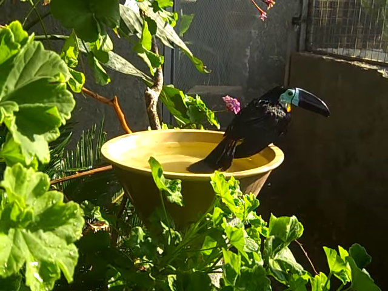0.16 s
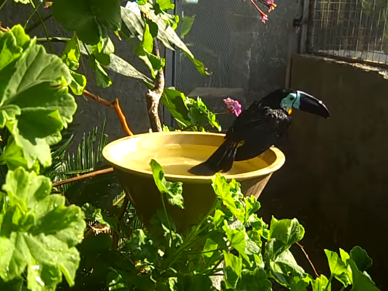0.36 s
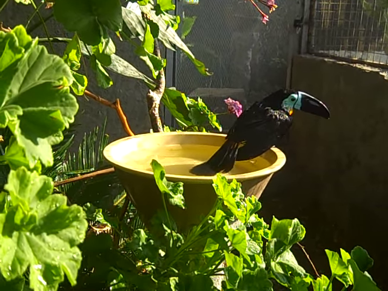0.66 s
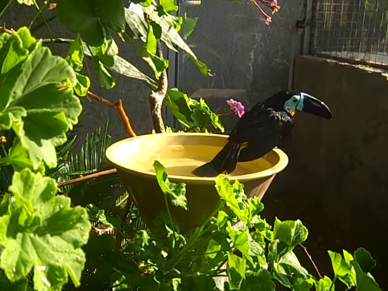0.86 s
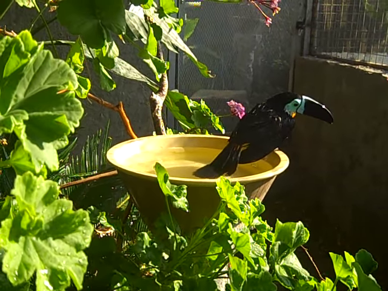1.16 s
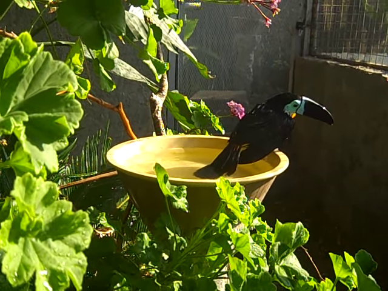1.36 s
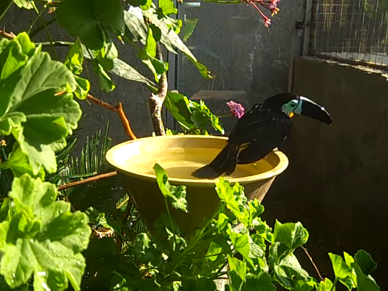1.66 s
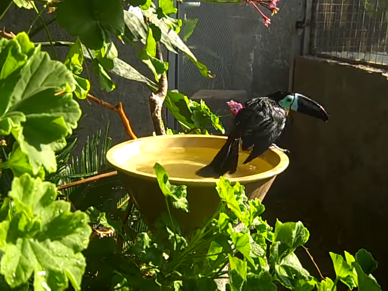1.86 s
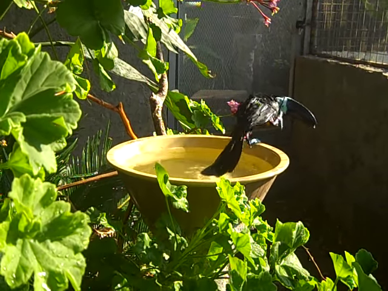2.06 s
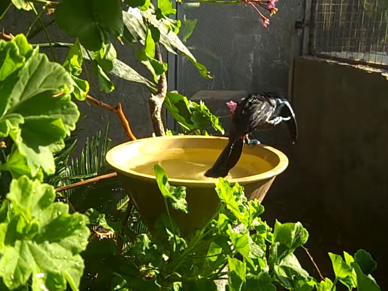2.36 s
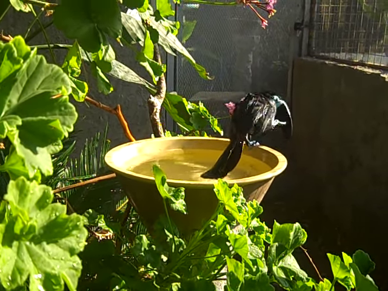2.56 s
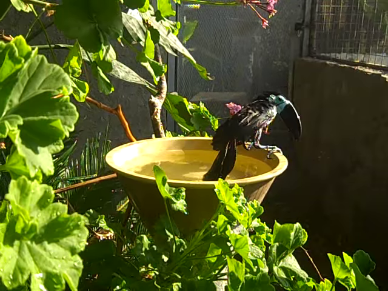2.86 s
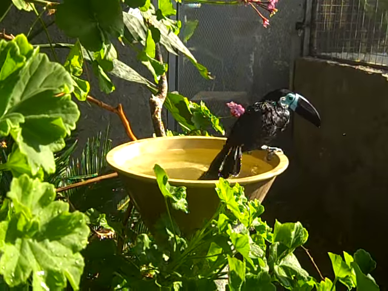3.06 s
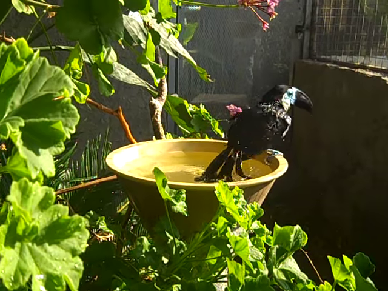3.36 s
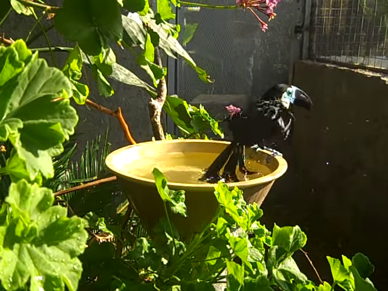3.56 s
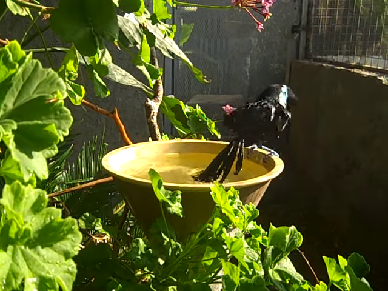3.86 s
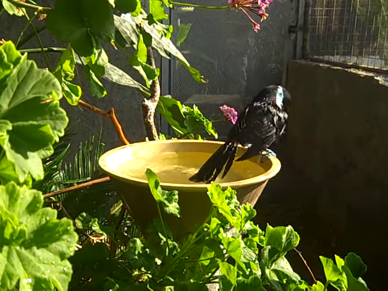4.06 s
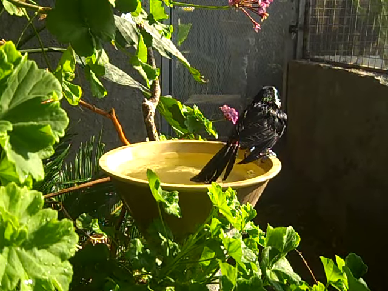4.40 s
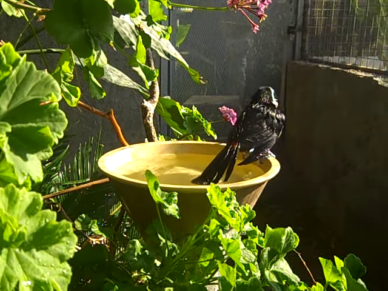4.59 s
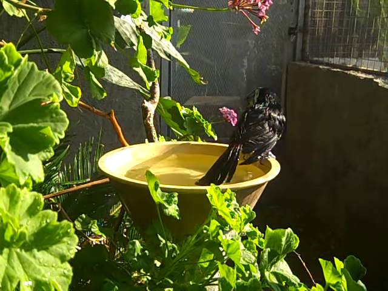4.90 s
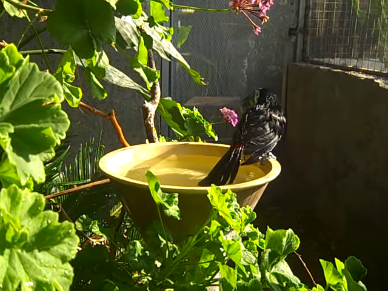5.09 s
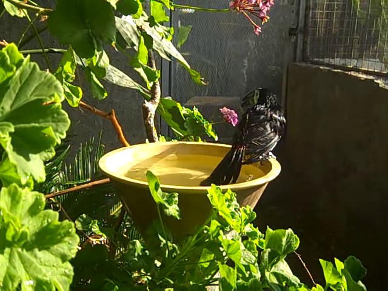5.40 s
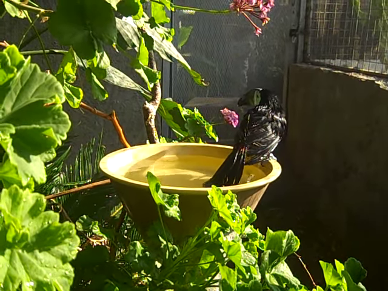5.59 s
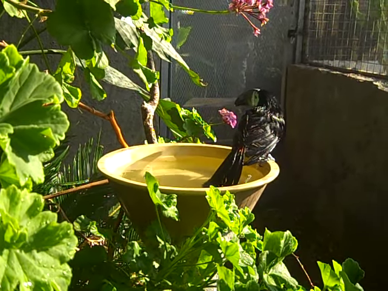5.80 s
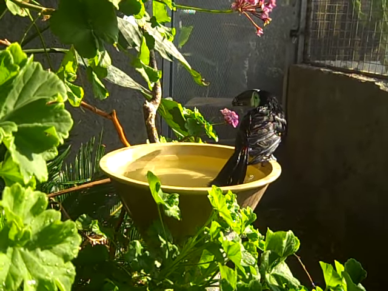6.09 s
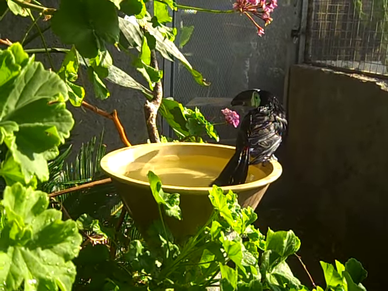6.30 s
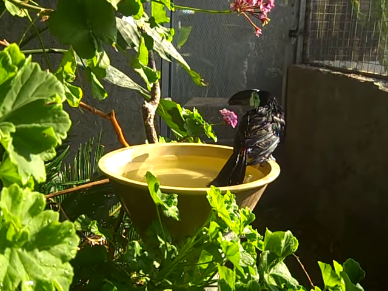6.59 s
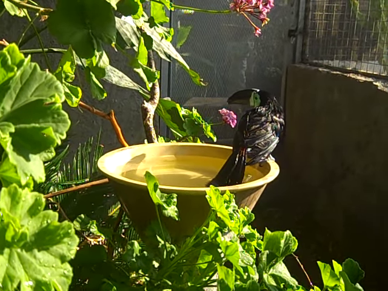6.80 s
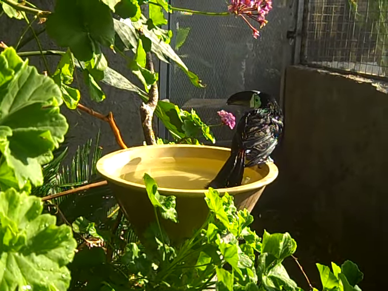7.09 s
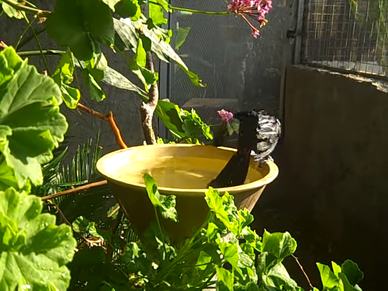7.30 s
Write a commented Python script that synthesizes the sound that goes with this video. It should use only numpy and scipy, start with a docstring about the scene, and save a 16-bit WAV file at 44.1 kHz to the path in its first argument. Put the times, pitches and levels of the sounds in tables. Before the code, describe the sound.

Piercing parrot screeches dominate, each bursting out with torn rasp before locking into a high, sagging whistle. Between the first three and the later ones, bright claw ticks, short wet feather swishes and a soft plumage ruffle come from a toucan on a bowl rim. Hoarse squawks and scratchy chirps sound behind, everything echoing in a small hard enclosure with faint air, loud peaks a little saturated.

```python
"""Hard-walled aviary: a parrot screeches ten times close by, the first already under way at the start.
Screech: two whistling membranes clash into sum and difference tones, with a rasp of torn noise.
A wet toucan on the rim of a water bowl ticks, swishes and rustles: short bursts of coloured noise.
Further off: bigger parrots squawk and call (pulses through throat resonances), small birds chirp
(gliding harmonics with scratch noise). Walls ring behind all the birds; quiet air noise lies beneath."""
import sys
import numpy as np
from scipy import signal
from scipy.fft import rfft, irfft, next_fast_len
from scipy.io import wavfile

SR = 44100
rng = np.random.default_rng(int(sys.argv[2]) if len(sys.argv) > 2 else 0)


def digitize_waveform(pressure):
    """Quantize a signal to 16-bit integers and store it at the path in sys.argv[1].

    Rows of a 2-D input are taken as channels; values are limited to [-1, 1].
    """
    field = np.atleast_2d(pressure).T
    bounded = np.clip(field, -1, 1)
    quanta = np.round(bounded * 32767).astype(np.int16)
    wavfile.write(sys.argv[1], SR, quanta)


N = 328545


def amp(db):
    """Decibels to gain."""
    return 10 ** (np.asarray(db) / 20)


def unit(x):
    """Scale to rms 1."""
    return x / np.sqrt(np.mean(np.abs(x) ** 2))


def colour(x, points):
    """Filter by a (f/Hz, gain/dB) spectrum, interpolated over log frequency."""
    hz, db = np.transpose(points)
    size = next_fast_len(len(x) + 512)
    f = np.maximum(np.fft.rfftfreq(size, 1 / SR), 1)
    gain = amp(np.interp(np.log(f), np.log(hz), db))
    return irfft(rfft(x, size) * gain, size)[:len(x)]


def wander(n, rate_hz):
    """Smooth random signal of rms 1, low-passed at rate_hz."""
    sos = signal.butter(2, min(rate_hz, SR / 3), fs=SR, output="sos")
    lead_in = int(SR / max(rate_hz, 5))
    return unit(signal.sosfilt(sos, rng.standard_normal(n + lead_in))[-n:])


def grains(n, rate_hz, spread_db):
    """Noise in lumps of uneven size, rms 1."""
    return unit(rng.standard_normal(n) * amp(spread_db * wander(n, rate_hz)))


def turns(hz):
    """Phase in radians of a moving frequency."""
    return 2 * np.pi * np.cumsum(hz) / SR


def arch(length_s):
    """Rounded rise and fall."""
    return np.sqrt(np.hanning(int(max(length_s, .005) * SR)))


def soft_edges(t, edge_s):
    """Gate that opens and closes in edge_s."""
    return np.clip(np.minimum(t, t[-1] - t) / edge_s, 0, 1)


def swell(rise_s, fall_s, depth_db, edge_s):
    """Gain that climbs depth_db to a rounded top and sinks again."""
    t = np.arange(0, rise_s + fall_s, 1 / SR)
    from_top = np.where(t < rise_s, 1 - t / rise_s, (t - rise_s) / fall_s)
    return soft_edges(t, edge_s) * amp(-depth_db * from_top ** 2)


def add(out, start_s, x):
    """Mix x in at a time; cut what lies outside the scene."""
    i = int(start_s * SR)
    x, i = x[max(-i, 0):], max(i, 0)
    out[i:i + len(x)] += x[:max(N - i, 0)]


def aviary(x, early_db, early_t60_s, late_db, late_t60_s, treble_db):
    """Direct sound, scattered echoes from near walls, and a longer tail with its own treble."""
    t = np.arange(SR) / SR
    arrived = t > .003
    early = unit(grains(SR, 3160, 7.7) * arrived * amp(-60 * t / early_t60_s))
    late = colour(rng.standard_normal(SR), [(100, 0), (5000, 0), (12000, treble_db)])
    late = unit(late * (1 - np.exp(-t / 0.0018)) * amp(-60 * t / late_t60_s))
    response = (amp(early_db) * early + amp(late_db) * late) / np.sqrt(SR)
    response[0] += 1  # direct sound
    return signal.fftconvolve(x, response / np.linalg.norm(response))[:N]


# air noise spectrum: f/Hz, gain/dB
AIR_SPECTRUM = [(25, 18), (60, -4), (120, 3), (300, 2.5), (600, 3), (1500, 1.5), (3000, 2), (5000, -4.5),
                (8000, -10), (12000, -12), (17000, -15)]


def quiet_air(level_db=-59):
    """Steady coloured noise whose level drifts slightly."""
    drift_db = 1.6 * wander(N, 4.1)
    return unit(colour(rng.standard_normal(N), AIR_SPECTRUM)) * amp(level_db + drift_db)


def hoarse(n, pitch_hz, throat, jitter, breath, bend=0.14, leak_db=-20):
    """Uneven pulses and puffs of air through throat resonances; the pitch rises and sags."""
    contour = 1 + bend * (np.sin(np.linspace(0, np.pi, n)) - .7)
    unsteady = .03 * wander(n, 25) + jitter * wander(n, 250)
    cycles = turns(pitch_hz * (contour + unsteady)) / (2 * np.pi)
    pulses = unit(np.diff(np.floor(cycles), prepend=0) * amp(5.7 * wander(n, 318)))
    puffs = unit(np.exp(-3 * (cycles % 1)) * rng.standard_normal(n))
    source = pulses + breath * puffs
    out = amp(leak_db) * source
    for hz, width_hz, db in throat:
        resonance = signal.iirpeak(hz, hz / (width_hz + 50), fs=SR)
        out = out + amp(db) * signal.lfilter(*resonance, source)
    tilt = [(200, -46), (600, -1), (1000, 0), (2200, 5), (5000, 1.5), (9000, -5), (14000, -15)]
    return unit(colour(out, tilt))


# faint far calls: t/s, length/s, nominal f/Hz, level/dB
FAINT_CALLS = [(0.229, 0.18, 398.3, -44.5), (0.789, 0.17, 600, -51), (2.824, 0.047, 378, -49)]


def far_calls():
    """Faint hoarse calls through one fixed throat."""
    out = np.zeros(N)
    throat = [(640, 140, -6), (1040, 140, -2), (1900, 360, -39)]
    for start_s, length_s, hz, db in FAINT_CALLS:
        shape = arch(length_s)
        voice = hoarse(len(shape), hz, throat, jitter=0.031, breath=0.56, bend=0.049)
        add(out, start_s, shape * amp(db) * voice)
    return out


def slide(x, share, wobble=.025, wobble_hz=22):
    """Bend pitch and resonances together, unsteadily, by a share as the beak opens or closes."""
    n = len(x)
    speed = 1 + share * np.linspace(-.5, .5, n) + wobble * wander(n, wobble_hz)
    return np.interp(np.cumsum(speed), np.arange(n), x)


# distant squawks: t/s, rise/s, fall/s, nominal f/Hz, slide (share over the call), peak level/dB, swell/dB
DISTANT_SQUAWKS = [(1.62, 0.19, .09, 518.3, -.22, -33.5, 10), (3.25, .15, .17, 309.8, -0.079, -36, 14),
                   (3.9, .26, .1, 456.4, .06, -27.5, 12.5), (7.12, .215, .07, 374.7, 0.089, -27.5, 26.5)]
# throat resonances, one list a squawk: f/Hz, width/Hz (hoarse adds 50), gain/dB
SQUAWK_THROATS = [
    [(1110, 130, -4.5), (1510, 130, -4), (2060, 64, 4.5), (3120, 85, -2.5), (3570, 84, -1.5),
     (4440, 59, -3.5)],
    [(850, 30, -11), (1120, 110, -8), (1850, 30, -3.5), (2170, 67, -10)],
    [(1426, 61, -5.5), (1800, 68, -10), (2190, 81, -6), (2710, 240, -5.5), (3280, 76, -3.5),
     (4640, 130, -3.5), (5250, 38, -7)],
    [(1300, 280, -1.5), (1760, 21.7, -7), (2073, 97, 5), (2560, 64, -6), (3320, 36, -2.5), (4200, 220, -28)],
]


def squawks():
    """Big parrots across the aviary: swelling hoarse calls that slide."""
    out = np.zeros(N)
    for row, throat in zip(DISTANT_SQUAWKS, SQUAWK_THROATS):
        start_s, rise_s, fall_s, hz, glide, db, swell_db = row
        gate = swell(rise_s, fall_s, swell_db, edge_s=0.037)
        call = hoarse(len(gate), hz, throat, jitter=.04, breath=.55)
        add(out, start_s, gate * amp(db) * slide(call, glide))
    return out


# small birds: t/s, length/s, start f/Hz, end f/Hz, level/dB, fundamental/dB re second harmonic
SMALL_BIRDS = [(1.597, 0.037, 2390, 2390, -47.5, -6), (1.598, 0.087, 2610, 2764, -45.5, -36),
               (1.891, 0.12, 2460, 2294, -47, -33), (2.214, 0.048, 2274, 2360, -46.5, -18),
               (2.348, 0.027, 1840, 1580, -46.5, -28), (2.378, 0.018, 2390, 2770, -35, -30),
               (2.597, 0.028, 2490, 3050, -40.5, -10.5), (2.812, 0.064, 2560, 2340, -51, -74),
               (4.692, 0.051, 3330, 2330, -55, -5), (4.93, 0.032, 2425, 2750, -42, -21),
               (5.719, 0.06, 2610, 2480, -44, -25), (5.781, 0.037, 3250, 3126, -47.5, -7),
               (5.819, 0.042, 3250, 3220, -48.5, -1.5), (6.426, 0.018, 1950, 2040, -76, 24),
               (7.194, 0.05, 2880, 3340, -44, -12)]


def chirps(third_db=-20, fourth_db=-19, jitter=0.049, breath_db=-9):
    """Short scratchy glides of four harmonics, in most of which the second carries the sound."""
    out = np.zeros(N)
    scratch_spectrum = [(1500, -52), (3200, -7), (5200, -3.5), (9500, -2), (15000, -17)]
    for start_s, length_s, from_hz, to_hz, db, first_db in SMALL_BIRDS:
        shape = arch(length_s)
        n = len(shape)
        phase = turns(np.linspace(from_hz, to_hz, n) * (1 + jitter * wander(n, 610)))
        tone = np.zeros(n)
        for harmonic, harmonic_db in enumerate([first_db, 0, third_db, fourth_db], 1):
            tone += amp(harmonic_db) * np.sin(harmonic * phase)
        scratch = unit(colour(grains(n, 820, 5.8), scratch_spectrum))
        add(out, start_s, amp(db) * np.sqrt(shape) * (np.sqrt(2) * tone + amp(breath_db) * scratch))
    return out


# plumage bouts: t/s, rise/s, fall/s, peak level/dB before trim, swell/dB
PLUMAGE_BOUTS = [(2.42, .23, 0.13, -59, 15), (2.799, 0.21, 0.025, -48, 20), (4.62, 0.28, 0.6, -47.5, 17),
                 (5.16, 0.027, 0.12, -44, 8.5)]
# plumage spectrum: f/Hz, gain/dB
PLUMAGE_SPECTRUM = [(47, -58), (80, -78), (199, -7.5), (378, -4.5), (734, 2.5), (785, 0.5), (1670, -2.5),
                    (2540, -5.5), (5170, -4.5), (5900, -7), (16000, -16.5)]


def ruffles(trim_db=2, drop_db=-4, drops_per_s=60):
    """Shaken plumage: swelling fine-grained noise plus sparse random impulses for droplets."""
    out = np.zeros(N)
    for start_s, rise_s, fall_s, db, swell_db in PLUMAGE_BOUTS:
        gate = swell(rise_s, fall_s, swell_db, edge_s=0.011)
        n = len(gate)
        drops = unit((rng.random(n) < drops_per_s / SR) * rng.standard_normal(n))
        rustle = unit(colour(grains(n, 200, 0.33), PLUMAGE_SPECTRUM))
        rustle += amp(drop_db) * unit(colour(drops, PLUMAGE_SPECTRUM))
        add(out, start_s, gate * amp(db + trim_db + 2.7 * wander(n, 39)) * rustle)
    return out


# wet feather swishes: t/s, length/s, level/dB
FEATHER_STROKES = [(0.138, 0.14, -46.5), (2.339, 0.043, -47), (2.409, 0.018, -39), (2.466, 0.016, -41.5),
                   (2.511, 0.02, -41.5), (2.543, 0.055, -46), (2.615, 0.019, -38), (2.682, 0.01, -39),
                   (2.72, 0.024, -47), (2.844, 0.033, -44), (2.922, 0.043, -59), (3.41, 0.19, -46.5),
                   (5.03, 0.038, -49)]
# swish spectrum: f/Hz, gain/dB
STROKE_SPECTRUM = [(200, -20), (1000, -8), (3000, 1.5), (5500, 2.5), (8000, 0), (13000, -5), (17000, -19)]


def feather_strokes():
    """Raked wet feathers: arched bursts of lumpy noise."""
    out = np.zeros(N)
    for start_s, length_s, db in FEATHER_STROKES:
        shape = arch(length_s)
        swish = unit(colour(grains(len(shape), 820, 5.4), STROKE_SPECTRUM))
        add(out, start_s, amp(db) * shape * swish)
    return out


# claw and beak ticks: t/s, click level/dB, knock level/dB (both before trim)
CLAW_TICKS = [(0.3398, -39, -57), (2.0492, -32.5, -53), (2.1409, -29.5, -59), (2.2676, -40, -71),
              (2.3346, -38.5, -63), (2.3674, -47, -74), (2.4184, -41, -65), (2.4722, -49, -49),
              (2.5738, -51, -58), (2.659, -31, -46), (2.9235, -41, -44), (4.7977, -34.5, -37.5),
              (4.8339, -32, -41), (5.0335, -28, -38), (7.0688, -44, -73)]
# click spectrum: f/Hz, gain/dB
CLICK_SPECTRUM = [(200, -37), (1000, -30), (2500, -7), (4000, -1.5), (5600, 7.5), (8000, 1.5), (12000, 1.5),
                  (17000, -17.5)]
# knock spectrum: f/Hz, gain/dB
KNOCK_SPECTRUM = [(100, -4), (500, -30), (1200, 6), (2500, -5), (5000, -12), (15000, -21)]


def ticks(click_trim_db=3, click_t60_s=0.012, knock_trim_db=5, knock_t60_s=0.029):
    """Claw and beak: a bright click and a lower, longer knock, both decaying noise."""
    out = np.zeros(N)
    t = np.arange(SR // 15) / SR
    for start_s, click_db, knock_db in CLAW_TICKS:
        click = unit(colour(rng.standard_normal(len(t)), CLICK_SPECTRUM))
        knock = unit(colour(rng.standard_normal(len(t)), KNOCK_SPECTRUM))
        add(out, start_s, amp(click_db + click_trim_db - 60 * t / click_t60_s) * click)
        add(out, start_s, amp(knock_db + knock_trim_db - 60 * t / knock_t60_s) * knock)
    return out


# rasp spectrum: f/Hz, gain/dB
RASP_SPECTRUM = [(100, -25), (700, -13.5), (1400, -23), (2400, -8.5), (3300, -1.5), (4300, -4.5),
                 (5600, -1), (7000, 2), (8400, -1), (9400, -5.5), (10300, -10.5), (11000, -13),
                 (13000, -14.5), (17000, -19.5)]


def torn_rasp(n, flicker_db=5, flicker_hz=75):
    """Gritty noise whose bands flare up each on its own."""
    edges_hz = np.linspace(60, 17500, 42)
    grit = grains(n, 780, 2.8)
    torn = np.zeros(n)
    for k, pair in enumerate(zip(edges_hz, edges_hz[1:])):
        band = signal.sosfilt(signal.butter(2, pair, "band", fs=SR, output="sos"), grit)
        flare = amp(flicker_db * np.clip(wander(n, flicker_hz), -2, 2))
        torn += (-1) ** k * band * flare
    return unit(colour(torn, RASP_SPECTRUM))


def exhale(length_s, upper_hz, lower_hz, upper_sag, lower_sag, scoop_s, lock_s, force,
           upper_db, lower_db, rasp_db, upper_fade, lower_fade):
    """One push of air: both pitches scoop up and sag; rasp bursts out first, then the whistle locks in."""
    t = np.arange(0, length_s, 1 / SR)
    spent = (t / length_s) ** 3.6  # sag comes late, as the air runs out
    push = force * np.exp(-((t - 0.015) / 0.041) ** 2)  # moment/s, width/s
    attack_s, attack_db, release_s = 0.016, 18.5, .04
    opening_db = -attack_db * np.maximum(1 - t / attack_s, 0)
    closing = np.maximum(1 - (length_s - t) / release_s, 0) ** 2
    past_middle_s = t - length_s / 2
    # shares of pitch lost: start scoop, sag, and the whistle's drop as the call closes
    upper_hz = upper_hz * (1 - .11 * np.exp(-t / .022) - upper_sag * spent - 0.0317 * closing)
    lower_hz = lower_hz * (1 - .125 * np.exp(-t / scoop_s) - lower_sag * spent)
    # dB: lock-in or opening, push, fade, release (least on the lower membrane)
    upper_db = upper_db - 35.5 * np.exp(-t / lock_s) + 3 * push - upper_fade * past_middle_s - 26 * closing
    lower_db = lower_db + opening_db + 9 * push - lower_fade * past_middle_s - 0.5 * closing
    rasp_db = rasp_db + opening_db + 4 * push - 16.5 * past_middle_s - 15.5 * closing
    return soft_edges(t, 0.0023), upper_hz, lower_hz, upper_db, lower_db, rasp_db


# tones the membranes make together: multiple of upper f, multiple of lower f
MIXED_TONES = [(2, -1), (1, 1), (0, 2), (3, -2), (-1, 2), (0, .5), (1.5, 0), (1, -1)]
# level of each mixed tone: dB re rasp, before trim
MIXED_TONE_DB = [-9.5, -12, -10, -15.5, -29, -44, -18.5, -29]
# noise shed by the lower membrane: f/Hz, gain/dB
GROWL_SPECTRUM = [(500, -59), (1200, -9.5), (1800, -1.5), (2600, -3.5), (3600, -28.5), (5000, 3),
                  (9000, -24)]


def screech(call, growl_db, octave_db=-16, waver_db=1, upper_jitter=0.00678, lower_jitter=0.02787,
            flutter=0.0066, shimmer_db=3, ragged_db=5,
            rasp_trim_db=-5, upper_trim_db=-0.5, lower_trim_db=-3, mix_trim_db=-1):
    """Two membranes in one airflow: a piercing upper whistle, a ragged lower one, mixed tones and rasp."""
    gate, upper_hz, lower_hz, upper_db, lower_db, rasp_db = exhale(*call)
    n = len(gate)
    # shared air: one membrane gains as the other loses
    trade_db = waver_db * wander(n, 16)
    upper_db, lower_db = upper_db + trade_db, lower_db - trade_db
    # more rasp against the whistle: less steady membranes
    unrest = np.clip(amp(1.5 * (rasp_db - upper_db + 6)), .5, 3.2)
    sway = flutter * np.sqrt(unrest) * wander(n, 99)
    upper = turns(upper_hz * (1 + sway + upper_jitter * unrest * wander(n, 650)))
    lower = turns(lower_hz * (1 + sway + lower_jitter * np.sqrt(unrest) * wander(n, 550)))

    shimmer = unit(amp(shimmer_db * np.sqrt(unrest) * wander(n, 234)))
    whistle = np.sin(upper) + amp(octave_db) * np.sin(2 * upper)
    voice = amp(upper_db + upper_trim_db) * shimmer * whistle
    ragged = unit(amp(ragged_db * wander(n, 145.5)))
    voice += amp(lower_db + lower_trim_db) * ragged * np.sin(lower)

    # a mixed tone is strong when its membranes are; half orders are period doubling
    upper_share = 1 / (1 + amp(lower_db - upper_db))
    for (a, b), db in zip(MIXED_TONES, MIXED_TONE_DB):
        lower_power = abs(b) / 4 if a else 1
        weight = (2 * upper_share) ** (abs(a) / 2) * (2 - 2 * upper_share) ** lower_power
        uneven = unit(amp(7.5 * wander(n, 285)))
        voice += amp(rasp_db + db + mix_trim_db) * weight * uneven * np.sin(a * upper + b * lower)

    rasp = torn_rasp(n) * amp(rasp_db + rasp_trim_db)
    rasp += unit(colour(grains(n, 410, 0.8), GROWL_SPECTRUM)) * amp(lower_db + growl_db)
    return gate * (np.sqrt(2) * voice + rasp) * unit(amp(0.54 * wander(n, 83)))


# screeches: t/s, length/s, upper f/Hz, lower f/Hz, upper sag (share), lower sag (share), lower scoop/s,
# lock-in/s, push (1 = usual), upper, lower, rasp level/dB (mid-call base, before push and trims),
# upper fade/(dB/s), lower fade/(dB/s), growl/dB re untrimmed lower membrane
PARROT_SCREECHES = [ (-0.28, 0.395, 5100, 3455, 0, .09, 0.029, .02, 1, -47, -25, -28, 32, 8, -7.5),
                    (0.394, 0.37, 5290, 3977, 0.079, 0.11, 0.027, 0.017, 0.19, -27.5, -25, -26.5, -10, 25, -14.5),
                    (0.928, 0.41, 5090, 3740, .07, 0.068, 0.054, 0.02, 1.08, -25, -31, -27.5, 41.5, -3, -17.5),
                    (2.983, 0.38, 4844, 3668, 0.05, 0.063, 0.011, 0.01, 0.75, -27, -28, -30.5, 47, -8, -12.5),
                    (3.563, 0.42, 4998, 3613, .025, 0.0096, .03, 0.0165, .8, -22, -32.5, -27, 2, -10, -13.5),
                    (4.156, 0.41, 5056, 3692, .10, .05, .016, 0.0095, 1.16, -23.5, -33, -29, 3, 12, -12),
                    (5.181, 0.32, 4850, 3576, .08, .06, 0.01188, 0.027, 0.67, -25, -28.5, -26.5, 15, 25, -17),
                    (5.895, 0.36, 5087, 3975, 0.067, 0.2, .014, 0.0087, 0.94, -24, -29.5, -29.5, 19, 12, -13.5),
                    (6.47, 0.44, 4990, 3558, .07, 0.046, .018, 0.016, 1.5, -22.5, -35, -29, 13, -11, -10),
                    (7.35, 0.47, 5010, 3604, .06, 0.3, 0.024, 0.014, 1.16, -22, -34, -28, 1, 17, -16)]


def screeches():
    """The near parrot: every screech at its time."""
    out = np.zeros(N)
    for start_s, *call, growl_db in PARROT_SCREECHES:
        add(out, start_s, screech(call, growl_db))
    return out


def scene():
    """Near and far birds in one hard-walled enclosure, over quiet air."""
    air = quiet_air()
    far = aviary(squawks() + far_calls(), early_db=4, early_t60_s=0.067,
                 late_db=8, late_t60_s=0.61, treble_db=6.5)
    small = aviary(chirps(), early_db=-6, early_t60_s=0.082,
                   late_db=-3.5, late_t60_s=0.23, treble_db=-13)
    toucan = aviary(ruffles() + feather_strokes() + ticks(), early_db=-2.5, early_t60_s=0.059,
                    late_db=-4, late_t60_s=0.7, treble_db=-3.5)
    parrot = aviary(screeches(), early_db=-3, early_t60_s=0.13,
                    late_db=-11, late_t60_s=0.53, treble_db=-3.5)
    return (air + far + small + toucan + parrot)[None]


def record(dry, lopsided=0.28, ceiling=.45, top_hz=17700):
    """Microphone rounds loud peaks lopsidedly, a rumble under each screech; steep cut above top_hz."""
    bent = ceiling * np.tanh((dry + lopsided * dry ** 2) / ceiling)
    coupled = signal.sosfilt(signal.butter(1, 3, "high", fs=SR, output="sos"), bent)  # blocks DC
    return signal.sosfilt(signal.ellip(10, .1, 70, top_hz, fs=SR, output="sos"), coupled)


dry = scene()
out = record(dry)
digitize_waveform(out)
```